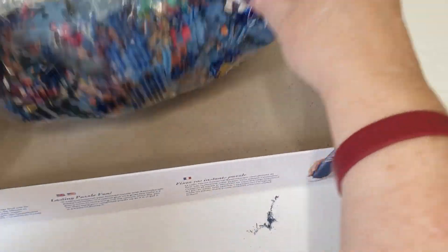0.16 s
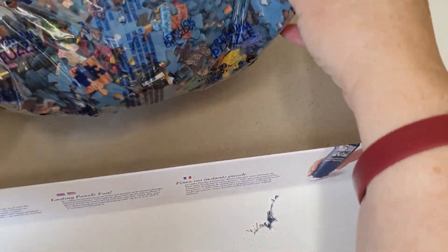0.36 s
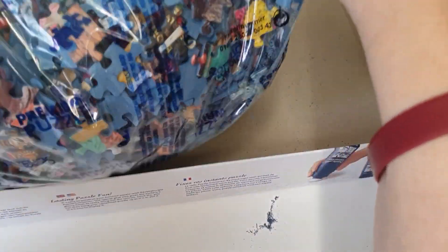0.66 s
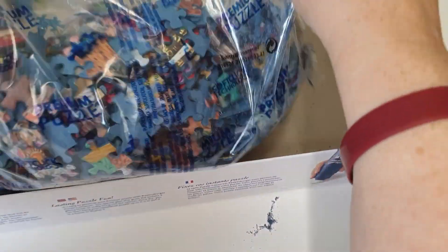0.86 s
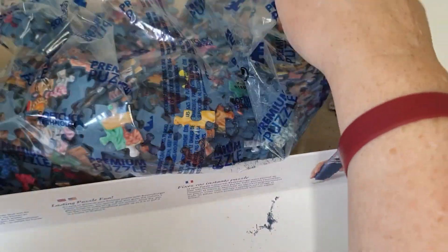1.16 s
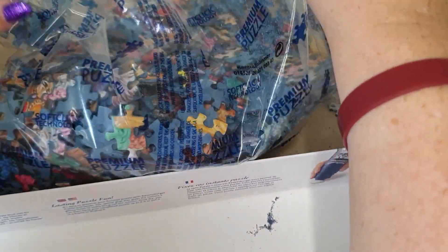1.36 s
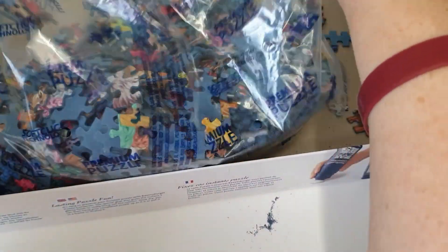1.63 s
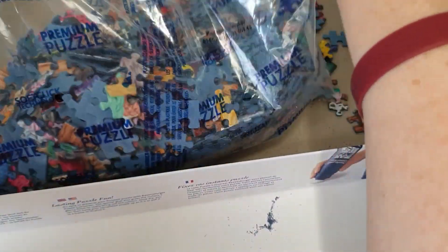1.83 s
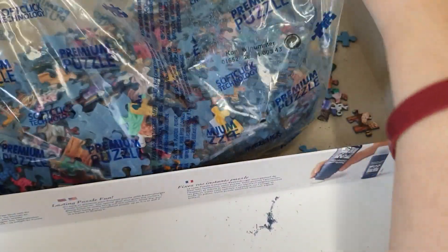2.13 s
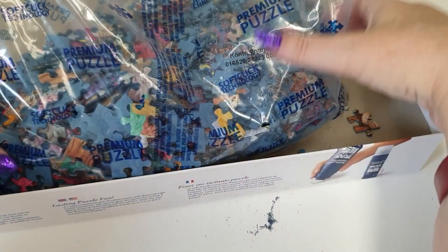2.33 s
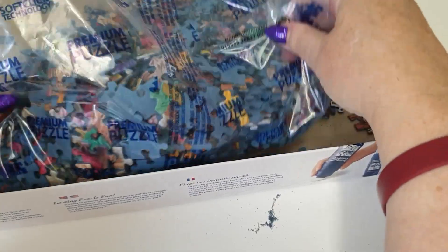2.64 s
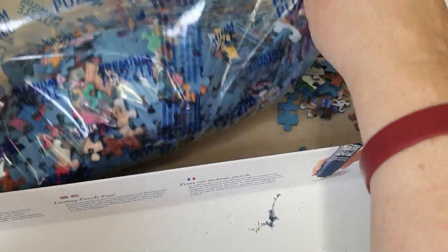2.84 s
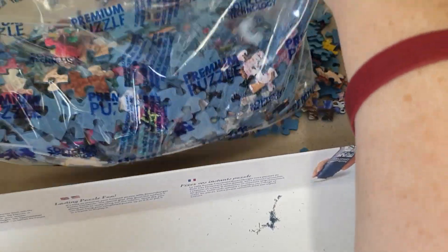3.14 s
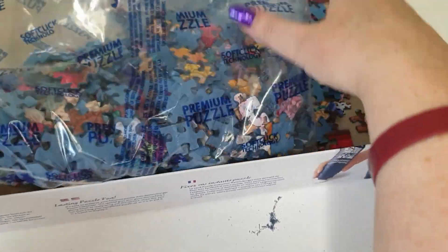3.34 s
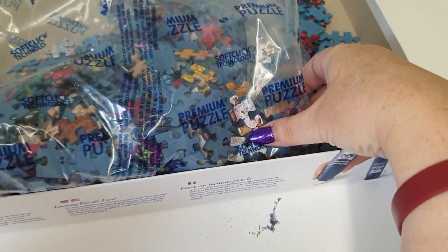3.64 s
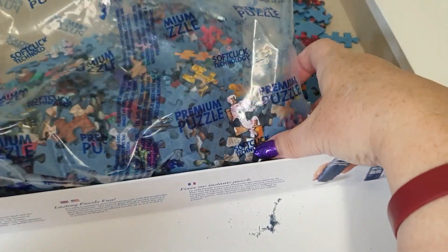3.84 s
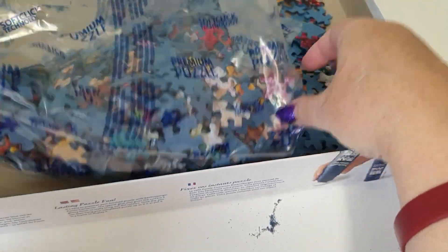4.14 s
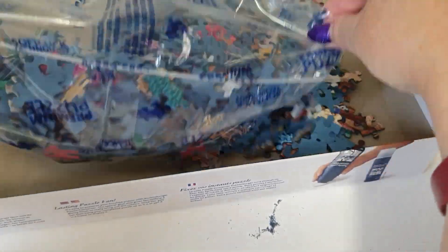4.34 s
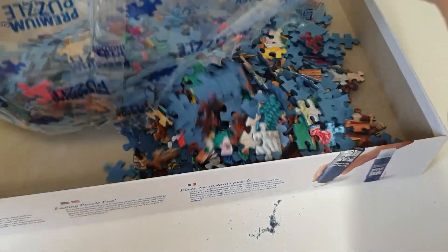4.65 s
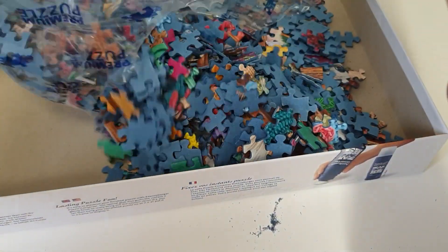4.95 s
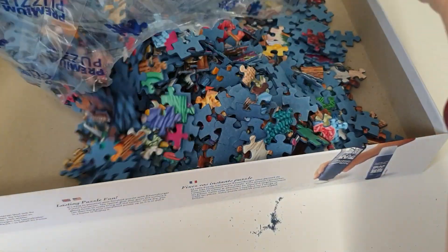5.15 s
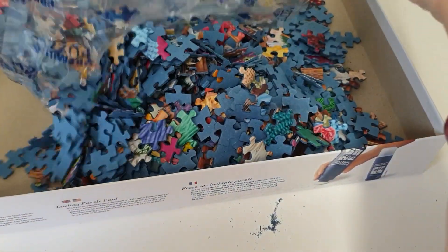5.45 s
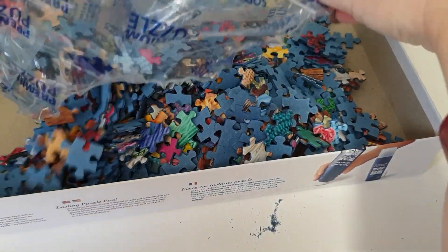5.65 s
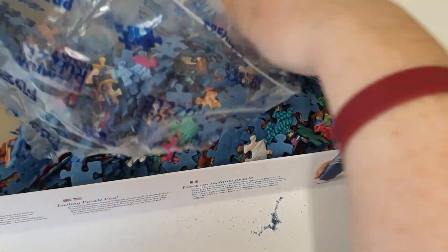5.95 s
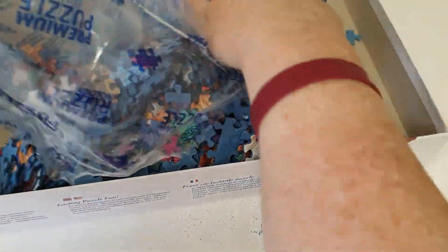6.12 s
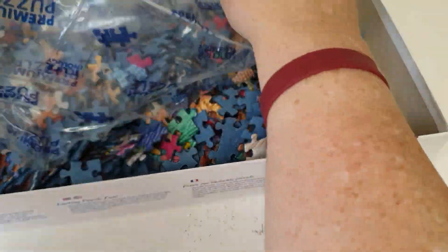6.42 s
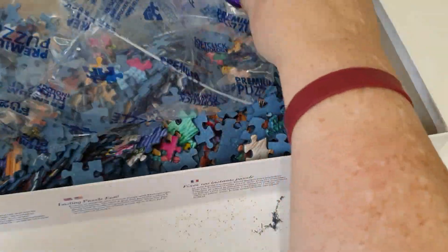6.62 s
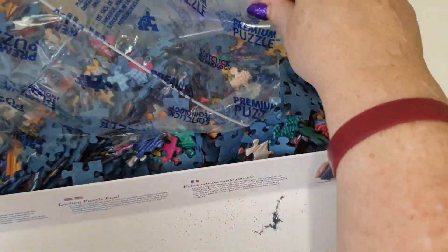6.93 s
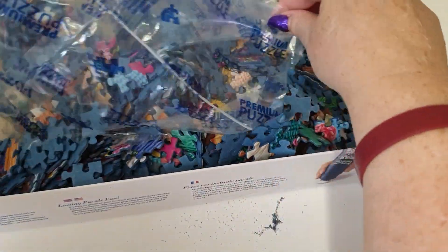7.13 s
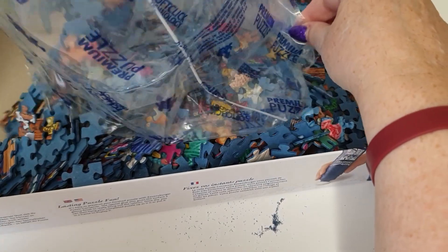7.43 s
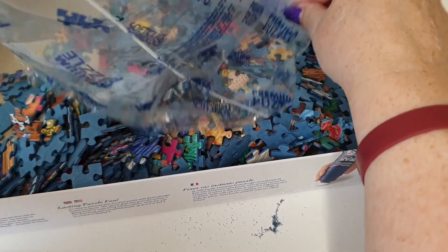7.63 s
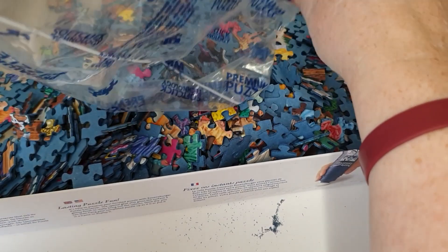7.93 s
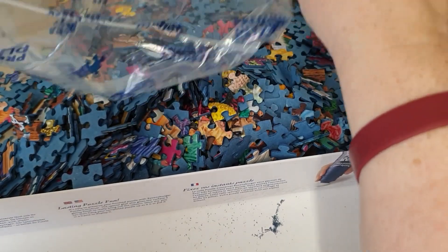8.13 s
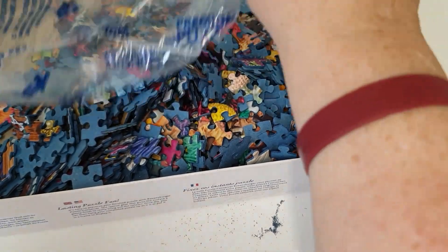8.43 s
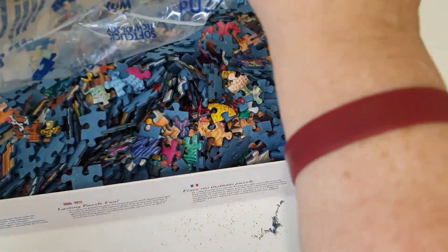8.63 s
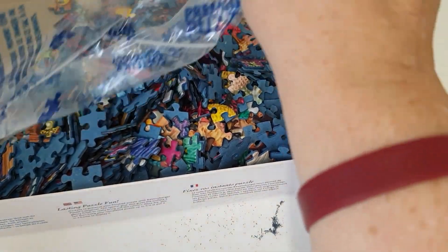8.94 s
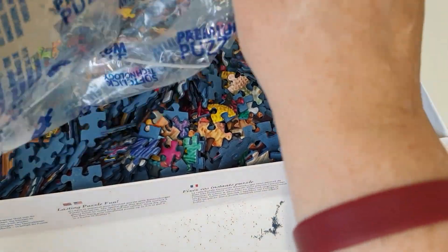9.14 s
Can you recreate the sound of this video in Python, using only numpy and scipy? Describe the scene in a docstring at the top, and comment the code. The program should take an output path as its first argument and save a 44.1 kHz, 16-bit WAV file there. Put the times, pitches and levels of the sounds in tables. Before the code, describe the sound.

A thin plastic bag full of cardboard puzzle pieces is handled and tipped into a shallow box, close to the microphone indoors. The plastic crackles and snaps while the pieces slide and click in uneven surges, some knocking hollowly on the box floor. The heavy bag rustles dully and rumbles through the table. A short puff of air hits the microphone early on; the pouring comes in bursts and eases toward the end.

```python
"""Indoors at a table, a thin plastic bag of cardboard puzzle pieces is tipped into a shallow card box. The film
crackles and snaps as its creases flip. The pieces slide and click against each other and knock on the box
floor, which rings, and a faint high swish passes midway. Underneath, the heavy bag rustles low and rumbles
through the table, and stirred air buffets the left microphone port in one short gust, over room tone."""
import sys
import numpy as np
from scipy import signal
from scipy.fft import rfft, irfft
from scipy.io import wavfile
from scipy.ndimage import uniform_filter1d

SR = 44100
rng = np.random.default_rng(int(sys.argv[2]) if len(sys.argv) > 2 else 0)


def transcribe(signal):
    """Save signal, clipped to [-1, 1], as a 16-bit WAV file at the path in sys.argv[1]."""
    frames = np.atleast_2d(signal).T
    limited = np.clip(frames, -1, 1)
    pcm = np.round(limited * 32767).astype(np.int16)
    wavfile.write(sys.argv[1], SR, pcm)


N = 409248

# Bass-heavy room tone: (frequency [Hz], level [dB])
ROOM_TONE_EQ = [(40, 10.5), (60, 12), (120, -6.5), (500, -25), (1500, -9), (4000, -29), (16000, -50)]
# Decay of the room reflections: (frequency [Hz], t60 [s])
ROOM_DECAY = [(200, 0.11), (1000, 0.09), (4000, 0.21), (12000, 0.16)]
# Wind on the microphone: (frequency [Hz], level [dB])
GUST_EQ = [(20, -26), (50, 1), (100, 7.5), (180, -7), (350, -20), (700, -64)]
# Puffs that make up the gust: (start [s], length [s], level [dB])
PUFFS = [(2.049, 0.049, -20), (2.136, 0.048, -24.5), (2.202, 0.041, -24), (2.291, 0.065, -37.5),
         (2.349, 0.045, -37.5)]
# Rumble through the table: (frequency [Hz], level [dB])
RUMBLE_EQ = [(30, 1), (60, 12), (90, -8), (140, -13), (300, -83)]
# Fader ride on that rumble: (time [s], level [dB])
RUMBLE_RIDE = [(0, -45), (.3, -60), (.5, -50), (.9, -45), (1.3, -63), (1.9, -45), (3.3, -58), (4.3, -60),
               (4.9, -45), (5.3, -62), (5.7, -49), (6.0, -69), (6.3, -52), (6.7, -62), (7.5, -52),
               (8.3, -65), (8.55, -45), (8.9, -50), (9.2, -48), (9.28, -53)]
# Dull bumps of the load in the bag: (frequency [Hz], level [dB])
RUSTLE_EQ = [(100, -13.5), (170, -5), (240, -1), (380, -3.5), (520, -12), (1200, -32.5)]
# The loaded bag is heaved over: (start [s], length [s], rustle level [dB])
HEAVES = [(0.118, 0.14, -36.5), (0.804, 0.23, -37), (1.59, 0.11, -39.5), (2.424, 0.051, -41.5),
          (3.605, 0.058, -52), (4.4, 0.34, -47)]
# Hands work the bag: (start [s], length [s], crackle level [dB], pieces level [dB], rustle level [dB])
HAND_MOVES = [(-.03, 0.039, -27, -37, -36), (0.073, .29, -37.5, -37.5, -45), (0.408, 0.18, -42, -37.5, -49),
              (.63, 0.35, -40, -39.5, -42.5), (0.958, 0.3, -38.5, -44, -49.5),
              (1.277, 0.15, -49, -39.5, -51.5), (1.492, 0.25, -43, -44, -49.5),
              (1.684, 0.24, -46, -40, -49), (1.95, 0.23, -45, -49, -46), (2.294, 0.21, -65.5, -63, -76),
              (2.455, 0.22, -45, -41.5, -48.5), (2.672, 0.39, -42, -40.5, -48.5),
              (3.047, 0.32, -45, -39, -47.5), (3.395, 0.16, -48.5, -51, -54.5),
              (3.568, 0.052, -43.5, -40.5, -45), (3.615, 0.099, -43, -42, -45.5),
              (3.783, 0.13, -47.5, -45, -52), (3.947, 0.19, -41, -45, -55), (4.17, .2, -46.5, -40.5, -49.5),
              (4.418, 0.54, -45.5, -41, -52.5), (5.005, 0.26, -44, -34.5, -50),
              (5.325, 0.4, -51.5, -42.5, -58.5), (5.572, 0.36, -48.5, -46, -53.5),
              (5.91, 0.053, -59.5, -52, -59), (5.982, .2, -49.5, -44, -53),
              (6.202, 0.082, -45.5, -47, -52.5), (6.34, 0.34, -51, -43, -53.5),
              (6.722, 0.28, -58.5, -49, -57), (6.96, 0.15, -49.5, -47, -50), (7.173, 0.15, -52, -48, -53),
              (7.248, 0.21, -49, -41.5, -51.5), (7.411, 0.39, -47, -40.5, -53),
              (7.85, 0.023, -52.5, -45, -51), (7.959, 0.12, -62, -57, -52.5), (8.118, 0.059, -61, -57, -49),
              (8.25, 0.11, -73, -76, -67), (8.345, 0.1, -60.5, -47.5, -49.5),
              (8.474, 0.16, -54, -44, -50.5), (8.662, 0.098, -47, -43, -44.5),
              (8.827, 0.088, -54, -45.5, -49), (8.976, 0.062, -55, -43.5, -47.5),
              (9.072, 0.046, -58, -49, -52.5), (9.155, 0.04, -59, -39.5, -42.5), (9.24, .05, -60, -46, -44)]
# Heaps slide out: (start [s], length [s], attack [s], patter level [dB], box ring level [dB])
SLIDES = [(.76, 0.18, 0.14, -32, -37.5), (0.993, 0.31, 0.022, -19, -37), (1.97, 0.19, 0.011, -31.5, -55),
          (3.01, 0.22, 0.067, -31, -50), (4.402, .07, 0.014, -27, -34.5), (4.492, 0.13, .015, -34.5, -27.5),
          (4.67, 0.21, 0.044, -34.5, -42.5), (5.028, 0.28, 0.12, -31, -44),
          (5.318, 0.39, 0.016, -40.5, -64), (5.678, 0.11, 0.037, -34.5, -36.5),
          (6.005, 0.023, .01, -48, -59), (6.07, 0.028, .01, -43, -50), (6.207, 0.047, 0.034, -38.5, -47),
          (7.426, 0.1, 0.032, -29.5, -48), (7.551, 0.26, 0.036, -29.5, -41.5),
          (7.855, 0.014, .015, -47, -56), (8.09, 0.055, .07, -43.5, -53), (8.67, 0.038, 0.021, -38, -51)]
# Modes of the box floor: (frequency [Hz], level [dB], t60 [s])
BOX_MODES = [(756, -2.5, 0.082), (786, 12.5, 0.03), (851.5, -8.5, 0.21), (947, 12, 0.024),
             (1276, 12.5, 0.078)]
# Blows on the box floor: (time [s], peak level [dB], favoured pitch [Hz])
KNOCKS = [(0.739, -24.5, 825), (0.81, -25, 980), (0.917, -24, 821), (1.009, -24.5, 970), (1.161, -29, 982),
          (1.216, -31, 985), (1.229, -26, 877), (1.286, -22, 740), (2.462, -35, 940), (2.8, -34, 786),
          (3.137, -21.5, 990), (3.202, -30.5, 864), (4.132, -29.5, 859), (4.412, -33, 751),
          (4.502, -21, 770), (4.537, -16.5, 783), (4.773, -15.5, 885), (5.05, -30, 740), (5.079, -17, 813),
          (5.09, -18, 810), (5.126, -24, 781), (5.151, -20.5, 726), (5.225, -25, 816), (5.613, -30.5, 851),
          (5.708, -15.5, 856), (7.04, -33, 738), (7.356, -32.5, 790), (7.597, -26.5, 947), (7.73, -17, 820)]
# Pieces that land hard: (time [s], peak level [dB], pitch [Hz])
LANDINGS = [(0.8092, -13, 2040), (0.8644, -27, 1470), (0.8745, -16.5, 1590), (0.9953, -14.5, 1880),
            (1.016, -10.5, 1820), (1.045, -8, 1910), (1.1585, -12, 1600), (1.398, -17.5, 1840),
            (1.49, -29, 2000), (1.8759, -17.5, 1720), (1.9889, -24, 1660), (2.5062, -23, 2270),
            (3.0579, -25, 1670), (3.0669, -16, 1790), (3.1158, -12, 2470), (3.6386, -21.5, 2110),
            (4.1212, -19.5, 2440), (4.364, -21.5, 1900), (4.4129, -15.5, 1910), (4.6127, -18, 1360),
            (4.6264, -14.5, 1780), (4.655, -11, 1920), (4.7107, -10, 1980), (4.7656, -15.5, 1920),
            (5.018, -22.5, 1900), (5.0805, -19, 1840), (5.1244, -6, 1900), (5.2086, -16.5, 2020),
            (5.2476, -10.5, 1970), (5.34, -16.5, 2020), (5.405, -33, 1920), (5.556, -18, 1900),
            (5.5824, -20, 2790), (5.6803, -18, 1900), (5.702, -15, 1990), (5.993, -22, 1810),
            (6.0774, -23.5, 2510), (6.1664, -24.5, 1510), (6.2512, -21, 2280), (6.5003, -29, 1300),
            (7.3463, -17, 2470), (7.439, -24, 2190), (7.45, -27, 1630), (7.5956, -14.5, 2880),
            (7.6306, -14.5, 1820), (7.7303, -26, 2220), (7.774, -21.5, 1590), (8.6797, -31, 1370),
            (9.0728, -24, 3000)]
# Tone of the plastic film: (frequency [Hz], level [dB])
FILM_EQ = [(290, -20.5), (500, -12.5), (787, -4), (1050, -6.5), (1920, -9), (5590, -11), (10200, -11.5),
           (15100, -14.5), (16500, -53)]
# Creases that snap: (time [s], peak level [dB], band centre [Hz], relative flutter level [dB])
SNAPS = [(0.2546, -13, 6440, -13), (0.3396, -18, 7890, -23), (0.5124, -17, 7900, -23),
         (0.546, -22.5, 8400, -30), (0.6303, -14.5, 7620, -26), (0.6732, -16, 10200, -21),
         (0.7813, -20, 7700, -16), (0.8, -16.5, 10600, -26), (0.8752, -25, 7780, -9),
         (0.9477, -14.5, 4710, -18), (1.4254, -23.5, 6810, -28), (1.49, -17.5, 12100, -31),
         (1.5222, -13.5, 9900, -36), (1.6327, -20, 5030, -17), (1.702, -22.5, 12300, -14),
         (1.9128, -20.5, 6840, -22), (1.9896, -15, 4050, -9), (2.1084, -20, 7500, -31),
         (2.2138, -20, 11300, -25), (2.262, -23, 5700, -16.5), (2.5057, -21.5, 6800, -8),
         (2.582, -16.5, 7810, -20), (2.6928, -14, 6960, -21), (2.802, -29, 9980, -16),
         (2.823, -16.5, 7840, -13), (3.0774, -19, 5940, -18), (3.1223, -10, 7550, -26),
         (3.1757, -21.5, 11500, -24), (3.3341, -17.5, 10600, -16), (3.4408, -24, 11100, -25),
         (3.5302, -22, 6700, -24.5), (3.6566, -18, 8400, -14), (3.9563, -23, 7200, -11),
         (4.0356, -15, 4900, -39), (4.094, -25, 7530, -21), (4.3053, -16.5, 11100, -18.5),
         (4.5734, -16.5, 4660, -8), (4.7113, -13, 7140, -17), (4.882, -30, 6190, -18),
         (5.0639, -20, 4420, -23), (5.1642, -22, 4500, -23), (5.245, -14.5, 9880, -20.5),
         (5.3622, -26, 4160, -20), (5.5822, -27, 6040, -18), (5.6391, -27, 6970, -15),
         (5.916, -35, 4060, -18), (5.9529, -37, 7480, -18), (6.0272, -39, 7440, -18),
         (6.2735, -18.5, 10200, -27), (6.4058, -32, 8190, -24), (6.554, -19.5, 8000, -12),
         (6.9895, -26.5, 8110, -14), (7.2708, -24.5, 6940, -15), (7.3464, -22, 4050, -12),
         (7.4847, -15, 10900, -12), (7.5967, -15.5, 9410, -10), (7.9504, -31, 4660, -21),
         (8.381, -27.5, 7250, -13), (8.6747, -21.5, 6760, -8), (8.7512, -24.5, 7170, -13),
         (8.8473, -23, 8000, -14), (8.94, -24.5, 9520, -21), (8.9931, -24, 4270, -26),
         (9.0726, -19, 4080, -24), (9.1785, -22, 6410, -15), (9.2609, -26, 4400, -12)]

HAND_FALL_DB_PER_S = 215
PIECE_HZ, SWISH_HZ = 1900, 7200  # centre pitches of the patter and of the high swish


def gain_of(db):
    """Decibels to a factor."""
    return 10 ** (np.asarray(db) / 20)


def unit_rms(x):
    """Scales to rms 1."""
    return x / np.sqrt(np.mean(x ** 2) + 1e-20)


def peaked(x, db):
    """Scales to a peak level."""
    return gain_of(db) * x / abs(x).max()


def lookup(points, hz):
    """Reads a table over log frequency."""
    freqs, values = np.transpose(points)
    return np.interp(np.log(hz + 1), np.log(freqs + 1), values)


def eq(x, curve):
    """Shapes x with a curve of (frequency [Hz], level [dB])."""
    size = x.shape[-1]
    return irfft(rfft(x) * gain_of(lookup(curve, np.fft.rfftfreq(size, 1 / SR))), size)


def butter(x, kind, hz, order):
    """High-pass or low-pass filter."""
    return signal.sosfilt(signal.butter(order, hz, kind, fs=SR, output="sos"), x)


def ring(hz, t60, size):
    """One struck mode."""
    t = np.arange(size) / SR
    return gain_of(-60 * t / t60) * np.sin(2 * np.pi * hz * t)


def panned(sound, pan_db, lag):
    """Two spaced ports hear the sound pan_db apart in level and up to 16 samples apart in time."""
    shift = int(np.clip(round(lag), -16, 16))
    padded = np.pad(sound, 16)
    pair = np.array([np.roll(padded, shift // 2), np.roll(padded, shift // 2 - shift)])
    return pair * gain_of([[pan_db / 2], [-pan_db / 2]])


def spot(mix, time, hit, pan_spread_db, lag_spread, pan_db=-1):
    """Drops a one-shot into the mix at a random stereo position."""
    pan, lag = rng.standard_normal(2)
    pair = panned(hit, pan_db + pan_spread_db * pan, lag_spread * lag)
    part = mix[:, max(round(time * SR) - 16, 0):][:, :pair.shape[1]]
    part += pair[:, :part.shape[1]]


def grain_cloud(grains, per_s, spread_db, envelope, lag_spread):
    """Each grain fires at random moments from its own stereo position; few hits are loud."""
    strength = gain_of(spread_db * np.minimum(rng.exponential(1, N), 4.5))
    hits = unit_rms(strength * (rng.random(N) < per_s / SR)) * rng.choice([-1, 1], N) * envelope
    which = rng.integers(0, len(grains), N)
    out = np.zeros((2, N))
    for k, grain in enumerate(grains):
        pan, lag = rng.standard_normal(2)
        pair = panned(grain / np.linalg.norm(grain), -1 + 5.6 * pan, lag_spread * lag)
        out += signal.oaconvolve((hits * (which == k))[None], pair, axes=1)[:, :N]
    return out


def swells(starts, lengths, dbs, attack_s, fall_db_per_s, sag_db_per_s=0):
    """Envelope of swells that build, hold or sag, then die away after their length; powers add."""
    hop = 64
    power = np.zeros(N // hop + 2)
    for start, length, db, attack in np.broadcast(starts, lengths, dbs, attack_s):
        t = np.arange(len(power)) * hop / SR - start
        drop_db = sag_db_per_s * np.maximum(t - attack, 0) + fall_db_per_s * np.maximum(t - length, 0)
        power += (np.clip(t / attack, 0, 1) * gain_of(db - drop_db)) ** 2
    return np.interp(np.arange(N) / hop, np.arange(len(power)), np.sqrt(power))


def handling(layer):
    """How hard the hands drive one layer."""
    starts, lengths, crackle, pieces, rustle = np.transpose(HAND_MOVES)
    dbs = {"crackle": crackle, "pieces": pieces, "rustle": rustle}[layer]
    return swells(starts, lengths, dbs, attack_s=0.013, fall_db_per_s=HAND_FALL_DB_PER_S)


def sliding(layer):
    """How hard the sliding heaps drive one layer."""
    starts, lengths, attacks, patter, box = np.transpose(SLIDES)
    dbs = {"patter": patter, "box": box}[layer]
    return swells(starts, lengths, dbs, attacks, fall_db_per_s=159, sag_db_per_s=32)


def load_jerks():
    """Level modulator: the load moves in small slips, each starting at once and dying away."""
    slips = (rng.random(N) < 70 / SR) * rng.exponential(1, N)
    motion = signal.lfilter([1], [1, -np.exp(-1 / (0.017 * SR))], slips)
    return np.minimum(unit_rms(motion - motion.mean()), 2.5)


def noise_bed(curve, own_left, own_right):
    """Shaped noise common to both ports, plus some of each port's own."""
    both, left, right = rng.standard_normal((3, N))
    return unit_rms(eq(np.array([both + own_left * left, both + own_right * right]), curve))


def room_tone():
    """A quiet bed of room noise, mostly bass."""
    return gain_of(-54.5) * noise_bed(ROOM_TONE_EQ, own_left=0.28, own_right=1.4)


def reflections(x, mono_below_hz=1060):
    """Sparse echoes, each band dying at its own speed; long waves reach both ports alike."""
    taps = np.zeros((2, SR // 2))
    arrivals = np.arange(60, SR // 2 - 20, 20) + rng.integers(0, 20, (2, (SR // 2 - 61) // 20))
    np.put_along_axis(taps, arrivals, rng.choice([-1., 1.], arrivals.shape), 1)
    hz, t, (left, other) = signal.stft(taps, SR, nperseg=256)
    shared = np.exp(-(hz / mono_below_hz) ** 2)[:, None]
    right = shared * left + np.sqrt(1 - shared ** 2) * other
    decay = gain_of(-60 * t / lookup(ROOM_DECAY, hz)[:, None])
    tail = signal.istft(np.array([left, right]) * decay, SR, nperseg=256)[1]
    return signal.fftconvolve(x, tail / np.linalg.norm(tail[0]), axes=1)[:, :N]


def gust():
    """Air stirred by the bag: lumpy turbulence, almost all on the left port."""
    puffs = swells(*np.transpose(PUFFS), attack_s=0.048, fall_db_per_s=700)
    return unit_rms(eq(rng.standard_normal(N), GUST_EQ)) * puffs * gain_of([[5.0], [-25.0]])


def table_rumble():
    """The shifting load sends low end through the table."""
    ride_db = np.interp(np.arange(N) / SR, *np.transpose(RUMBLE_RIDE))
    return noise_bed(RUMBLE_EQ, own_left=0.3, own_right=0.58) * gain_of(ride_db)


def bag_rustle(jerk):
    """The load shifts in the bag with soft, dull bumps."""
    decay = gain_of(-60 * np.arange(2048) / SR / 0.042)
    bumps = [eq(rng.standard_normal(2048) * decay, RUSTLE_EQ) for _ in range(32)]
    heaves = swells(*np.transpose(HEAVES), attack_s=0.096, fall_db_per_s=84, sag_db_per_s=3.5)
    drive = np.hypot(handling("rustle"), heaves) * gain_of(2.94 * jerk)
    return grain_cloud(bumps, per_s=500, spread_db=2.36, envelope=drive, lag_spread=6.4)


def high_swish():
    """A brief high swish midway through: a fine patter in one narrow, high band."""
    pings = [ring(hz, t60=0.007, size=400) for hz in SWISH_HZ * np.exp(0.047 * rng.standard_normal(12))]
    drive = swells(starts=5.47, lengths=0.36, dbs=-54, attack_s=0.08, fall_db_per_s=HAND_FALL_DB_PER_S)
    return grain_cloud(pings, per_s=1500, spread_db=3.0, envelope=drive, lag_spread=5.5)


def knock(favoured_hz, size=2600):
    """The struck spot favours the box modes near one pitch; little radiates below the first mode."""
    modes = np.zeros(size)
    for hz, db, t60 in BOX_MODES:
        accent, detune = rng.standard_normal(2)
        mode_db = db + 4.4 * accent - 51.0 * abs(np.log(hz / favoured_hz))
        modes += gain_of(mode_db) * ring(hz * (1 + 0.025 * detune), t60, size)
    return butter(modes, "high", 720, order=8)


def box_floor(jerk):
    """The hollow card floor rings under the stream of pieces and under single heavy blows."""
    knocks = [knock(hz) for hz in np.linspace(740, 1000, 16)]
    drive = np.hypot(gain_of(-9.5) * handling("pieces"), sliding("box")) * gain_of(1.9 * jerk)
    out = gain_of(-2.0) * grain_cloud(knocks, per_s=600, spread_db=1.5, envelope=drive, lag_spread=7.7)
    for time, db, hz in KNOCKS:
        spot(out, time, peaked(knock(hz), db), pan_spread_db=2.5, lag_spread=7.6, pan_db=-1.5)
    return out


def click(hz, t60=0.018, upper_db=-6.5, tick_db=-13.0, size=800):
    """A struck card piece: two close, short modes, a higher one and a dry tick; too small for bass."""
    t = np.arange(size) / SR
    modes = ring(hz, t60, size)
    modes += gain_of(-2.0) * ring(hz * rng.uniform(0.795, 1.259), t60, size)
    modes += gain_of(upper_db) * ring(hz * rng.uniform(1.332, 1.762), 1.1 * t60, size)
    body = butter(modes, "low", 3500, order=3)  # soft card damps high modes
    tick = rng.standard_normal(size) * gain_of(tick_db - 60 * t / 0.004)
    return butter(body + tick, "high", 900, order=2)


def puzzle_pieces(jerk):
    """Pieces patter against each other as they shift and slide; some land hard."""
    pitches = PIECE_HZ * np.exp(0.232 * rng.standard_normal(48))
    clicks = [click(hz, t60=0.012, upper_db=-1.0, tick_db=-15.5) for hz in pitches]
    drive = np.hypot(handling("pieces") * gain_of(0.86 * jerk), sliding("patter") * gain_of(0.88 * jerk))
    out = gain_of(-2.5) * grain_cloud(clicks, per_s=1400, spread_db=3.04, envelope=drive, lag_spread=4.5)
    for time, db, hz in LANDINGS:
        spot(out, time, peaked(click(hz), db), pan_spread_db=3.5, lag_spread=6.1)
    return out


def snap(hz, t60=0.0079, focus_db=8.0, flutter_db=-17.0, size=700):
    """A crease flips over: a crack, strongest in one broad band, and a duller flutter as it settles."""
    t = np.arange(size) / SR
    crack, flutter, wobble = rng.standard_normal((3, size))
    crack *= gain_of(-60 * t / t60) + gain_of(-8.0 - 60 * t / 0.031)  # transient plus short tail
    crack = eq(crack, [(hz / 2, -focus_db), (hz, 0), (hz * 2, -focus_db)])
    flicker_db = 4.2 * unit_rms(uniform_filter1d(wobble, 60))
    flutter *= gain_of(flutter_db + flicker_db - 60 * t / 0.18)
    flutter = eq(flutter, [(700, -1.5), (3000, 5.5), (12000, -7.0)])
    return eq(crack + flutter, FILM_EQ)


def plastic_film(jerk):
    """The film creases under the hands: a fine crackle with single loud snaps on top."""
    ticks = [snap(hz, t60=0.0043, focus_db=2.0, flutter_db=-22.5) for hz in np.geomspace(1800, 13000, 40)]
    drive = handling("crackle") * gain_of(2.53 * jerk)
    out = gain_of(3.0) * grain_cloud(ticks, per_s=3000, spread_db=4.6, envelope=drive, lag_spread=9.0)
    for time, db, hz, flutter_db in SNAPS:
        crease = snap(hz, flutter_db=flutter_db, size=4000)
        spot(out, time, peaked(crease, db), pan_spread_db=5.7, lag_spread=8.0)
    return out


def scene():
    """Film, pieces, box and rustle jerk together; the close sounds feed the room, over gust and tone."""
    jerk = load_jerks()
    close = plastic_film(jerk) + puzzle_pieces(jerk) + box_floor(jerk) + bag_rustle(jerk)
    close += table_rumble() + high_swish()
    return close + gain_of(-7.0) * reflections(close) + gust() + room_tone()


def record(dry, low_cut_hz=45.6, high_cut_hz=15800):
    """The microphone loses the lowest bass; a steep filter trims the very top."""
    thinned = butter(dry, "high", low_cut_hz, order=4)
    high_cut = signal.firwin(511, high_cut_hz, window=("kaiser", 9), fs=SR)
    return signal.oaconvolve(thinned, high_cut[None], "same")


dry = scene()
out = record(dry)
transcribe(out)
```